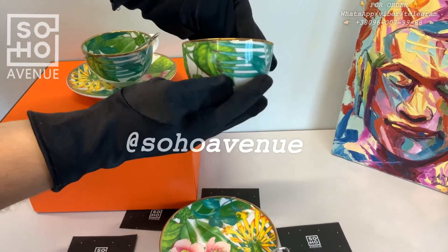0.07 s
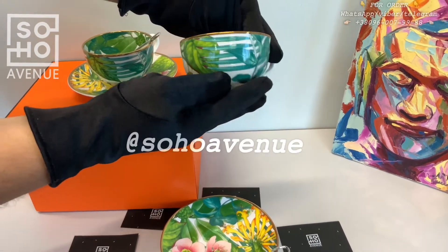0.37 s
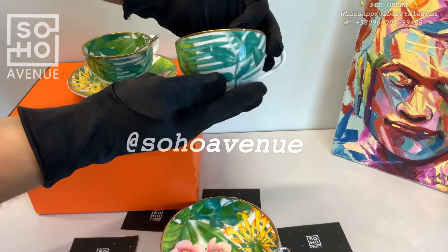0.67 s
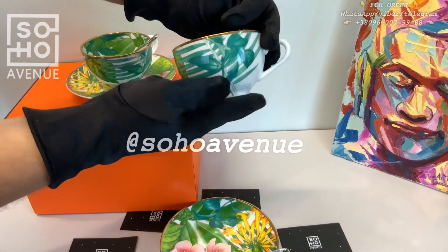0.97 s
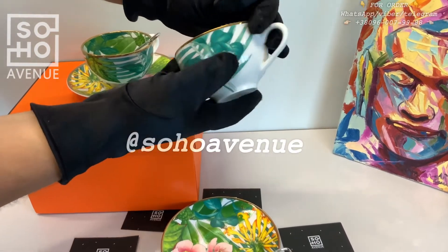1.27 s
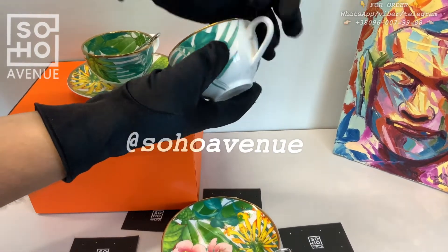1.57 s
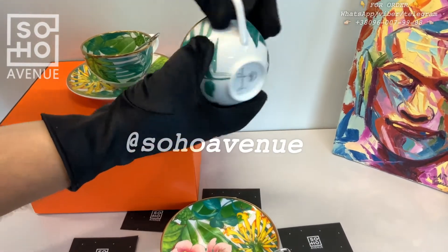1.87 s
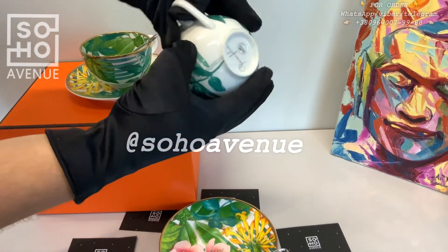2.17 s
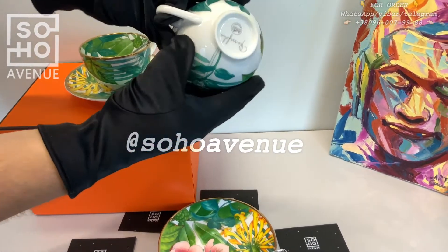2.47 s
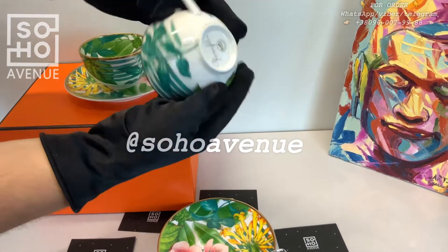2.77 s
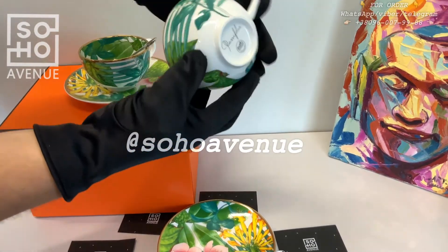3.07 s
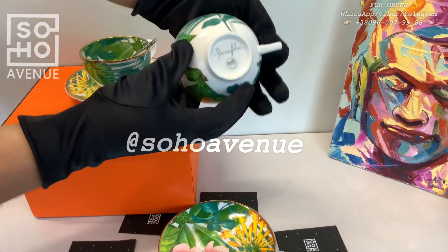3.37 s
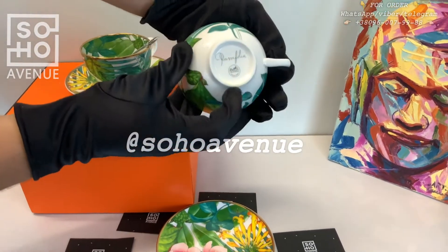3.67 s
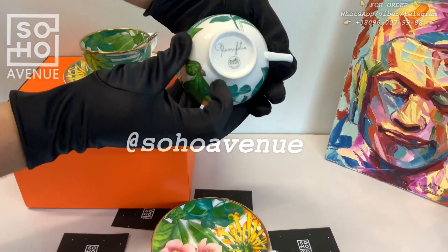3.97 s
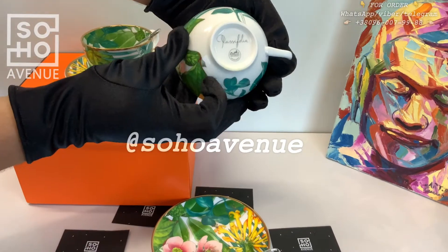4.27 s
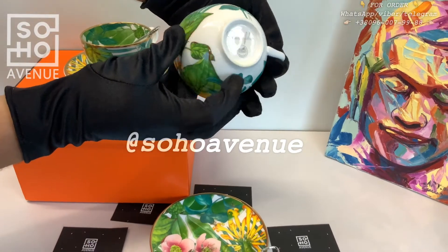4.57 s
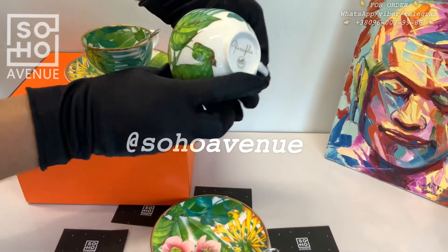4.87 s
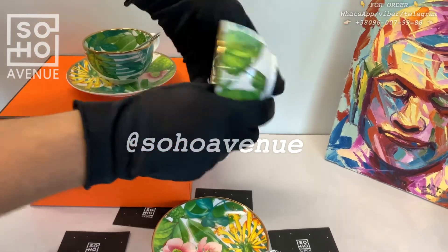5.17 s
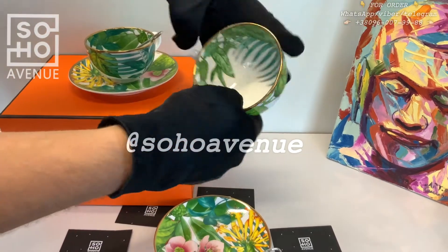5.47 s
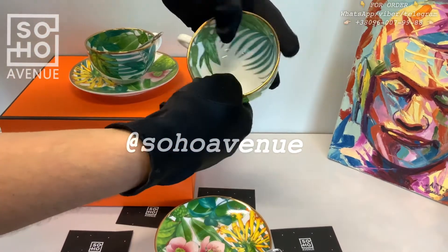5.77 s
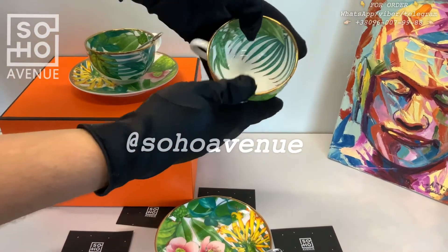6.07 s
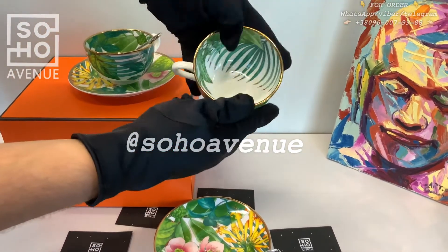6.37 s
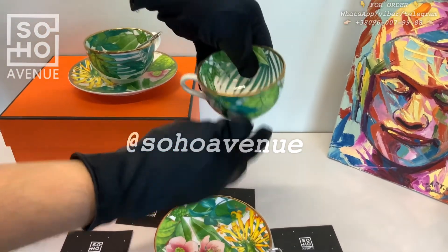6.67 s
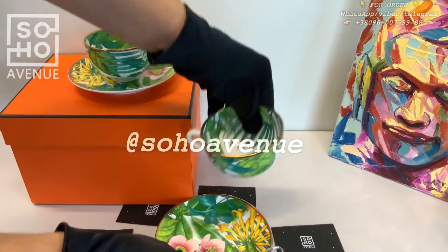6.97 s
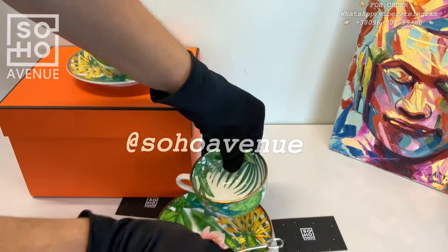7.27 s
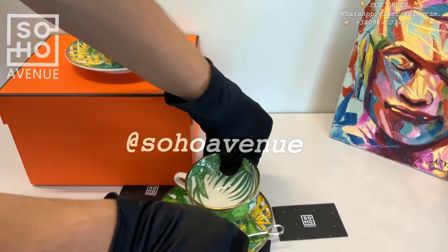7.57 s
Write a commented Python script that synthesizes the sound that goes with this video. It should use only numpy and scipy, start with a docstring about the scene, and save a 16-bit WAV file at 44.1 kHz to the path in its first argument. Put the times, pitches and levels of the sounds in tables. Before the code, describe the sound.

Gloved hands faintly rub and turn a porcelain cup over quiet ventilation, then set it on its saucer with a sharp clink.

```python
"""A soft cloth hiss and a faint porcelain ring: gloved hands turn a teacup close to the microphones.
Threads slide over the glaze; their friction feeds the cup's modes, and fingertips slip and squeak.
At the end the cup is set on its saucer: a knock, a table thud, a quick bright chatter as the foot settles.
Behind it, ventilation hushes and drones in a quiet, softly rumbling room."""
import sys
import numpy as np
from scipy import signal
from scipy.fft import rfft, irfft, next_fast_len
from scipy.io import wavfile
from scipy.ndimage import uniform_filter1d, map_coordinates

SR = 44100
rng = np.random.default_rng(int(sys.argv[2]) if len(sys.argv) > 2 else 0)


def store_wav(level_fs):
    """Save 16-bit WAV to argv[1]."""
    pcm = np.round(np.clip(np.atleast_2d(level_fs), -1, 1) * 32767)
    wavfile.write(sys.argv[1], SR, pcm.T.astype(np.int16))


N = 340452

# glove slides over the glaze: (full-speed time [s], hold [s], hiss [dB], fizz [dB])
GLOVE_STROKES = [(.03, 0.24, -88, -99), (0.375, 0.15, -89, -97), (.567, .01, -83, -99),
                 (0.637, .025, -79, -80), (.755, .015, -80, -89), (.87, 0.055, -75.5, -75.5),
                 (.945, 0.13, -73.5, -69.5), (1.117, .015, -67, -80), (1.145, 0.017, -77, -72.5),
                 (1.222, .28, -82, -85), (1.345, 0.018, -90, -80), (1.652, 0.023, -78.5, -74.5),
                 (1.79, .03, -77, -76), (1.857, 0.049, -72.5, -68.5), (1.93, 0.097, -76, -77),
                 (2.06, 0.086, -82, -83), (2.236, 0.075, -74.5, -74.5), (2.35, 0.095, -76.5, -85),
                 (2.688, 0.07, -74.5, -69.5), (2.803, 0.15, -77.5, -81), (2.93, 0.12, -77, -79),
                 (3.06, 0.15, -81, -86), (3.23, .08, -84, -87), (3.366, 0.037, -78.5, -77.5),
                 (3.462, 0.059, -77, -99), (4.4, .03, -85, -85), (4.52, 0.11, -96, -93),
                 (4.67, .025, -91, -75), (4.862, .035, -71.5, -73), (4.958, .04, -75, -93),
                 (5.03, 0.064, -75.5, -75.5), (5.145, .025, -82, -71.5), (5.2, 0.014, -76, -87),
                 (5.315, 0.12, -87, -85.5), (5.535, .12, -84.5, -88), (5.67, 0.12, -82, -84),
                 (5.806, .04, -76, -76.5), (5.87, 0.037, -77, -70), (5.97, 0.2, -79.5, -82.5),
                 (6.38, .085, -72, -75.5), (6.512, 0.042, -75.5, -77), (6.6, 0.15, -83, -103),
                 (6.8, 0.25, -90.5, -99), (7.21, 0.1, -79.5, -88)]
# fingertip lets go: (time [s], level [dB], Gaussian width [s], cup ring re level [dB])
FINGER_SLIPS = [(0.371, -83, 0.011, 0), (1.122, -79, .012, 0), (1.845, -66.5, 0.0091, -4),
                (3.164, -78, 0.023, -12), (4.695, -79, 0.013, -1), (6.524, -79, 0.012, -6)]
# cup foot meets saucer: (time [s], ring [dB], knock [dB], snap [dB])
FOOT_CONTACTS = [(7.6263, -26, -7, -21.5), (7.6273, 1, -35, -18), (7.6464, 0.5, -29, -41),
                 (7.6492, -0.5, -31, -27), (7.6585, -13, -37, -28.5), (7.6703, -7.5, -19.5, -40),
                 (7.691, -30, -44, -29.5)]


def amp(db):
    """Decibels to gain."""
    return 10 ** (np.asarray(db) / 20)


def unit(x):
    """Scale to rms 1."""
    return x / np.sqrt(np.mean(x ** 2) + 1e-20)


def even(x, window_s):
    """Hold the running rms at 1."""
    return x / np.sqrt(np.abs(uniform_filter1d(x ** 2, int(window_s * SR), axis=-1)) + 1e-20)


def along(points, hz):
    """Interpolate (Hz, value) points on a log axis."""
    freqs, values = np.transpose(points)
    return np.interp(np.log(hz + 1), np.log(freqs + 1), values)


def wobble(rate_hz, size=N):
    """Smooth random curve through unit-variance knots."""
    knots = rng.standard_normal(int(size * rate_hz / SR) + 4)
    return map_coordinates(knots, [np.arange(size) * rate_hz / SR])


def filtered(x, response):
    """Apply a complex frequency response."""
    size = next_fast_len(N + SR // 2)
    return irfft(rfft(x, size) * response(np.fft.rfftfreq(size, 1 / SR)), size)[..., :N]


def colour(points):
    """Response of a (Hz, dB) spectrum."""
    return lambda f: amp(along(points, f))


def resonances(modes):
    """Causal response of (Hz, width Hz, dB) modes."""
    return lambda f: sum(amp(db) * 1j * f * width / (hz * hz - f * f + 1j * f * width)
                         for hz, width, db in modes)


def stereo_noise(response):
    """Coloured noise of rms 1 at two microphones: alike in the bass, apart in the midrange."""
    # microphone likeness: (frequency [Hz], left-right correlation)
    likeness = [(60, 0.98), (120, 1), (240, 0.73), (480, 0.15), (950, -0.079), (1890, -0.044), (3770, 0.14),
                (7520, 0.08), (15000, 0.92)]
    # microphone balance: (frequency [Hz], left minus right [dB])
    balance = [(60, 1.5), (120, -0.5), (240, 1.5), (480, 1), (950, 7.5), (1890, 2.5), (3770, 1), (7520, -4),
               (15000, 2.5)]

    def mid_side(f):
        angle = np.arccos(np.clip(along(likeness, f), -1, 1)) / 2
        return response(f) * np.array([np.cos(angle), np.sin(angle)])
    mid, side = filtered(rng.standard_normal((2, N)), mid_side)
    pair = np.array([mid + side, mid - side])
    return unit(filtered(pair, lambda f: amp(np.outer([.5, -.5], along(balance, f)))))


def near(x, width):
    """Narrow the stereo image, as for a close source."""
    mid = x.mean(axis=0)
    return (mid + width * (x - mid)) * np.sqrt(2 / (1 + width ** 2))


def effort(moves, rise_db_per_s=333, fall_db_per_s=250):
    """Gain of (s, hold s, dB) hand movements: each swells, holds and fades; powers add."""
    t = np.arange(0, N, 64) / SR
    power = 0
    for start, hold, db in moves:
        rise_db = rise_db_per_s * np.maximum(start - t, 0)
        fall_db = fall_db_per_s * np.maximum(t - start - hold, 0)
        power += amp(db - rise_db - fall_db) ** 2
    return np.interp(np.arange(N), np.linspace(0, N, len(power)), np.sqrt(power))


def touch(time_s, width_s):
    """Gaussian envelope of a brief touch."""
    return np.exp(-((np.arange(N) / SR - time_s) / width_s) ** 2 / 2)


def ventilation(rumble_db=-56, air_db=-63.5, left_lag_s=0.00017):
    """Moving air hushes, drones and stirs the room's low modes; the lows reach the left side later."""
    # room resonances: (frequency [Hz], width [Hz], level [dB])
    room_modes = [(48.3, 3.8, 2), (62.9, 6.9, -8), (80.1, 5.4, 3.5)]
    # ventilation drone: (frequency [Hz], width [Hz], level [dB])
    drone_modes = [(97.6, 6.2, -3.5), (132.3, 4.2, -5), (185, 11, -21), (270.5, 2.6, -16), (368, 7, -20)]
    # drone swell: (time [s], level [dB])
    drone_swell = [(0, -67), (3.6, -67), (4.4, -61.5), (5.2, -61), (5.7, -66), (6.4, -60.5), (7, -64.5),
                   (7.7, -59.5)]
    # ventilation and microphone hiss: (frequency [Hz], density [dB])
    air_spectrum = [(40, -14.5), (140, 0), (250, -4), (420, -1), (520, -4.5), (870, -2.5), (1100, -8.5),
                    (1500, -10.5), (2000, -15), (2500, -22), (3100, -29), (4300, -32.5), (6000, -33),
                    (7200, -35), (15500, -37.5)]
    rumble_gain = amp(rumble_db + 2.25 * wobble(12))
    drone_gain = amp(np.interp(np.arange(N) / SR, *np.transpose(drone_swell)))
    rumble_band = colour([(25, -26), (42, 0), (90, 0), (180, -20)])
    drone_band = colour([(40, -15), (90, 0), (400, 0), (800, -15)])
    rumble = filtered(rng.standard_normal(N), lambda f: resonances(room_modes)(f) * rumble_band(f))
    drone = filtered(rng.standard_normal(N), lambda f: resonances(drone_modes)(f) * drone_band(f))
    low = rumble_gain * even(rumble, 0.084) + drone_gain * unit(drone)
    low = filtered(low, lambda f: np.exp(np.outer([-1j, 1j], np.pi * f * left_lag_s)))
    return low + amp(air_db) * stereo_noise(colour(air_spectrum))


def room_echo(x):
    """Nearby walls answer; each frequency dies at its own rate."""
    # room decay: (frequency [Hz], t60 [s])
    decay = [(150, 0.16), (1200, 0.13), (4000, 0.21), (14000, 0.2)]
    hz, t, spectra = signal.stft(rng.standard_normal((2, SR // 2)), SR, nperseg=256)
    tail = signal.istft(spectra * amp(-60 * t / along(decay, hz)[:, None]), SR, nperseg=256)[1]
    tail = np.pad(tail, ((0, 0), (SR // 300, 0)))
    return signal.fftconvolve(x, tail / np.linalg.norm(tail[0]), axes=1)[:, :N]


def glove_cloth(hiss_gain, fizz_gain):
    """Threads slide on the glaze: a hiss and a brighter fizz, with a burst at each slip."""
    # cloth friction, both: (frequency [Hz], density [dB])
    hiss_spectrum = [(1500, -11), (2700, -3.5), (3800, -0.5), (5400, 0.5), (7500, -4), (10000, -17),
                     (13000, -24), (16000, -20)]
    fizz_spectrum = [(3000, -26), (6000, 3.5), (8000, -0.5), (10000, 6), (12500, 0.5), (14500, 0),
                     (16000, -10)]
    hiss = near(stereo_noise(colour(hiss_spectrum)), 0.99)
    fizz = near(stereo_noise(colour(fizz_spectrum)), 0.64)
    cloth = hiss * hiss_gain + fizz * fizz_gain
    for time_s, db, width_s, _ in FINGER_SLIPS:
        cloth += amp(db) * touch(time_s, width_s) * (1.24 * fizz + .5 * hiss)
    return cloth * amp(1.05 * wobble(550))  # threads catch unevenly


def friction_ring(modes, wander_db=1.0):
    """Friction feeds each mode in fits; the shifting grip damps now one, now another."""
    ring = np.zeros(N)
    for hz, width, db in modes:
        tone = filtered(rng.standard_normal(N), lambda f: np.abs(resonances([(hz, width, 0)])(f)) ** 1.5)
        ring += even(tone, 0.061) * np.sqrt(width) * amp(db + wander_db * wobble(7.6))
    return even(ring * amp(0.94 * wobble(90)), .1)


def rubbed_cup(stroke_gain, brush_db=-20.5):
    """Pressing fingers, light strokes and slips set the cup's mode families ringing."""
    # cup modes, four families: (frequency [Hz], nominal width [Hz], density [dB])
    rim = [(3640, 45, 0), (6980, 50, -9), (14100, 60, -17)]
    wall = [(3420, 70, 0), (5500, 60, -9), (13720, 70, -14)]
    bowl = [(6110, 70, 0), (6080, 480, -13), (10400, 80, -9), (15000, 80, -21)]
    foot = [(9000, 150, 0), (6990, 55, -4), (11100, 80, -7)]
    # how readily each rings: {family: gain [dB]}
    family_db = {"rim": 1.5, "wall": -0.5, "bowl": 5, "foot": 2}
    # finger rubs: (full-pressure time [s], hold [s], level [dB], favoured family, others re level [dB])
    rubs = [(1.347, 0.036, -79.5, "wall", -10), (1.492, 0.027, -78.5, "wall", -11),
            (1.83, .05, -76.5, "bowl", -2), (1.915, 0.097, -75.5, "rim", -4),
            (1.96, .04, -79.5, "bowl", -12), (2.08, .04, -84.5, "wall", -5),
            (2.236, .18, -83.5, "bowl", -9), (2.25, .13, -83, "wall", -16),
            (2.437, 0.041, -78.5, "wall", -17), (2.62, .04, -83.5, "wall", -4.5),
            (2.706, .025, -74, "rim", -4.5), (2.78, .03, -76.5, "rim", -12), (2.86, .06, -78.5, "foot", -5),
            (2.955, 0.061, -78.5, "bowl", -3.5), (3.066, .1, -81.5, "rim", -4),
            (3.23, .09, -86, "wall", -9), (3.47, 0.032, -84.5, "rim", -19), (4.52, .08, -93, "wall", -8),
            (4.86, .05, -74, "bowl", -7), (4.955, .06, -79, "rim", -7), (5.03, 0.017, -76.5, "wall", -2),
            (5.08, 0.054, -79.5, "foot", -4.5), (5.683, .035, -80.5, "bowl", -11),
            (5.821, .04, -74.5, "bowl", -8), (5.87, 0.13, -73, "rim", -8), (6.02, .03, -80.5, "foot", -2),
            (6.093, 0.021, -73.5, "rim", -10), (6.18, .04, -91, "bowl", -1),
            (6.35, .075, -79.5, "wall", -7), (6.502, 0.02, -80.5, "bowl", -0.5),
            (6.68, 0.21, -97, "foot", -6), (6.958, .025, -80, "foot", -11.5)]
    families = dict(rim=rim, wall=wall, bowl=bowl, foot=foot)
    rings = {name: friction_ring(modes) for name, modes in families.items()}
    cup = np.zeros(N)
    for name, ring in rings.items():
        moves = [(time_s, hold_s, db if favoured == name else db + others_db)
                 for time_s, hold_s, db, favoured, others_db in rubs]
        pressure = effort(moves, rise_db_per_s=400, fall_db_per_s=230)
        drive = np.hypot(pressure, amp(brush_db) * stroke_gain)
        cup += amp(family_db[name]) * drive * ring
    for time_s, db, width_s, ring_db in FINGER_SLIPS:
        cup += amp(db + ring_db) * touch(time_s, width_s) * (rings["bowl"] + rings["wall"]) / 2
    return cup


def finger_squeaks():
    """A fingertip squeaks on one mode, its phase wavering."""
    # squeaks: (time [s], frequency [Hz], level [dB], Gaussian width [s])
    squeaks = [(1.37, 13720, -76, .018), (1.51, 11100, -87, .02), (1.85, 10400, -57, 0.01),
               (2.982, 10400, -69, .022), (3.0, 15100, -80, .014), (3.06, 15030, -79, .014),
               (4.89, 10400, -79, .015), (5.175, 10400, -73, .013), (5.58, 12900, -78, .014),
               (5.89, 10430, -64, 0.026), (6.41, 15000, -82, .016), (6.524, 10400, -65, 0.013)]
    t = np.arange(N) / SR
    waver_rad = .9 * wobble(150)
    return sum(amp(db) * touch(time_s, width_s) * np.sin(2 * np.pi * hz * t + waver_rad)
               for time_s, hz, db, width_s in squeaks)


def table_thud(t60_s=0.31):
    """The table shivers under the load from the first contact on."""
    # wooden table top: (frequency [Hz], width [Hz], level [dB])
    wood_modes = [(112, 10.7, 5.5), (180, 34, 2.5), (370, 66, 0), (567, 68, -11), (770, 54, -11)]
    age = np.maximum(np.arange(N) / SR - FOOT_CONTACTS[0][0], 0)
    envelope = (age > 0) * amp(-25 - 60 * age / t60_s)
    wood = stereo_noise(lambda f: np.sqrt(sum(np.abs(resonances([m])(f)) ** 2 for m in wood_modes)))
    thud = envelope * even(near(wood, 0.57), 0.034)
    highpass = signal.butter(4, 85, "high", fs=SR, output="sos")
    return signal.sosfilt(highpass, thud) * amp([[.8], [-.8]])


def saucer_knock(hz=1063, rise_s=0.0019, bend_cycles=1.15):
    """The saucer knocks on the table at each contact; higher bending waves arrive first."""
    knock = np.zeros((2, N))
    for time_s, _, db, _ in FOOT_CONTACTS:
        age = np.maximum(np.arange(N) / SR - time_s, 0)
        swell = (age / rise_s * np.exp(1 - age / rise_s)) ** 2
        cycles = hz * age + bend_cycles * (1 - np.exp(-age / rise_s))
        knock += amp(db) * swell * np.sin(2 * np.pi * cycles + np.array([[.3], [-.3]]))
    return knock * amp([[1.4], [-1.4]])


def glaze_snap(snap_t60_s=0.067, tick_t60_s=0.0079, tick_hz=4150):
    """Glaze meets glaze: a tick at first touch, a dry snap at every contact."""
    # contact snap: (frequency [Hz], density [dB])
    snap_spectrum = [(300, -12), (1200, 4), (2200, -8.5), (2900, -12.5), (4200, -3), (6000, -4.5),
                     (7200, -15), (8500, -12), (9800, -15), (13000, -20), (14800, -15), (16000, -8.5)]
    t = np.arange(N) / SR
    snap_gain = sum((t >= time_s) * amp(db - 60 * np.maximum(t - time_s, 0) / snap_t60_s)
                    for time_s, _, _, db in FOOT_CONTACTS)
    age = np.maximum(t - FOOT_CONTACTS[0][0], 0)
    tick_gain = amp(-11 - 60 * age / tick_t60_s) * (1 - np.exp(-age / 0.00073))
    tick = tick_gain * np.sin(2 * np.pi * tick_hz * age)
    return tick + snap_gain * near(stereo_noise(colour(snap_spectrum)), 0.89)


def china_ring(scatter_db=2.5, jolt_rad=0.79, build_s=.0005, t60_scale=0.8, chatter=.33):
    """Each contact adds energy to every mode and jolts its phase; the rocking foot roughens the ring."""
    # cup and saucer modes:
    # (frequency [Hz], level [dB], unscaled t60 [s], left minus right [dB], left lead [rad])
    china_modes = [(1392, -33, .3, 3, .5), (2353, -34, .25, 4, -.5), (3520, -28, .17, 1, 1.6),
                   (4897, -16.5, .18, 0, .4), (5405, -26, .24, 1, .7), (5900, -40, .4, -6, .5),
                   (6541, -23.5, .24, -6, .3), (7585, -37, .25, 8, -.2), (8156, -21, .14, -2, .1),
                   (8400, -27, .18, 0, .3), (8437, -23, .18, 0, .3), (8992, -31, .3, -1, .4),
                   (10572, -33, .4, 0, -.4), (11340, -37, .5, 0, -.3), (11935, -39, .2, 0, -.1),
                   (12276, -35, .35, 1, -.6), (12886, -27, .14, 0, -.5), (12924, -26, .18, 0, -.5),
                   (14304, -30, .22, 0, -.7), (15530, -31, .16, 0, -1)]
    times, contact_db, _, _ = np.transpose(FOOT_CONTACTS)
    first = int((times[0] - .01) * SR)
    t = np.arange(first, N) / SR
    age = t - times[:, None]
    onset = 1 - np.exp(-np.maximum(age, 0) / build_s)
    side = np.array([[.5], [-.5]])
    ring = np.zeros((2, N))
    for hz, db, t60_s, pan_db, lead_rad in china_modes:
        blow_db = contact_db - scatter_db * rng.standard_normal(len(times))
        blows = onset * amp(blow_db[:, None] - 60 * np.abs(age) / (t60_s * t60_scale))
        envelope = np.linalg.norm(blows, axis=0)
        phase = rng.uniform(0, 2 * np.pi) + jolt_rad * rng.standard_normal(len(times)) @ onset
        rocking = 1 + chatter * (wobble(169, len(t)) + 1j * wobble(173, len(t)))
        carrier = np.exp(1j * (2 * np.pi * hz * t + phase + side * lead_rad))
        ring[:, first:] += amp(db + side * pan_db) * envelope * np.imag(rocking * carrier)
    return ring


def scene():
    """The landing with its echo, the handling before it, and the ventilation."""
    clink = china_ring() + glaze_snap()
    knock, thud = saucer_knock(), table_thud()
    echo = near(room_echo(amp(-6.5) * clink + amp(-5.5) * knock), 0.55)
    hiss_gain = effort([(time_s, hold_s, db) for time_s, hold_s, db, _ in GLOVE_STROKES])
    fizz_gain = effort([(time_s, hold_s, db) for time_s, hold_s, _, db in GLOVE_STROKES])
    cloth = glove_cloth(hiss_gain, fizz_gain)
    cup = (rubbed_cup(hiss_gain) + finger_squeaks()) * amp([[-.7], [.7]])
    return ventilation() + echo + cloth + cup + thud + knock + clink


def record(dry):
    """Steep low-pass at 15.8 kHz."""
    return signal.sosfilt(signal.ellip(10, .2, 90, 15800, fs=SR, output="sos"), dry)


dry = scene()
out = record(dry)
store_wav(out)
```